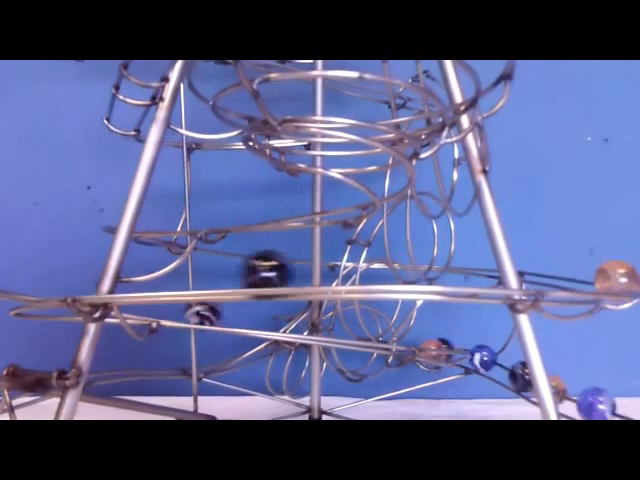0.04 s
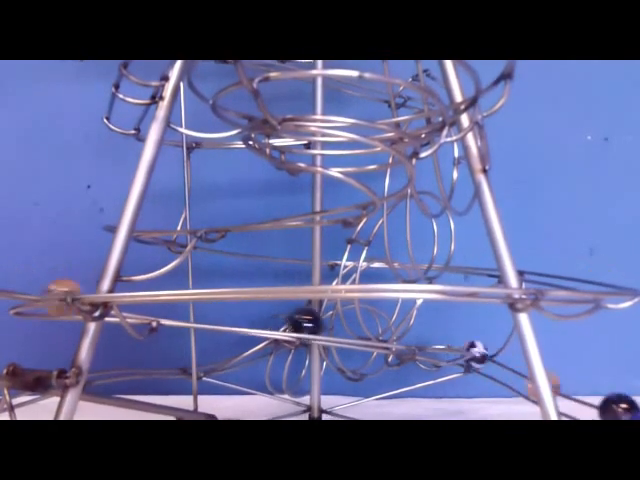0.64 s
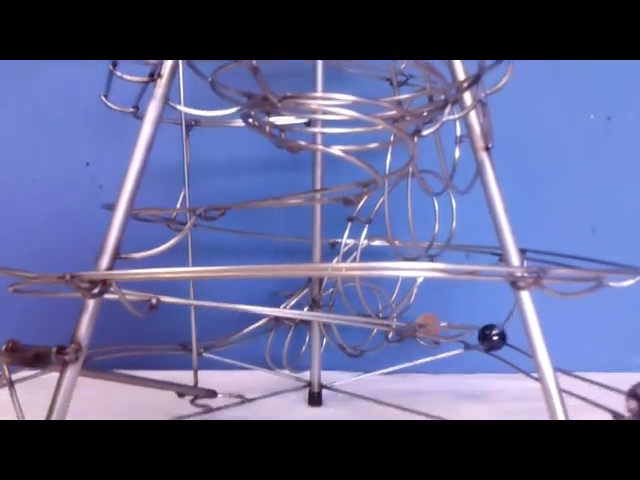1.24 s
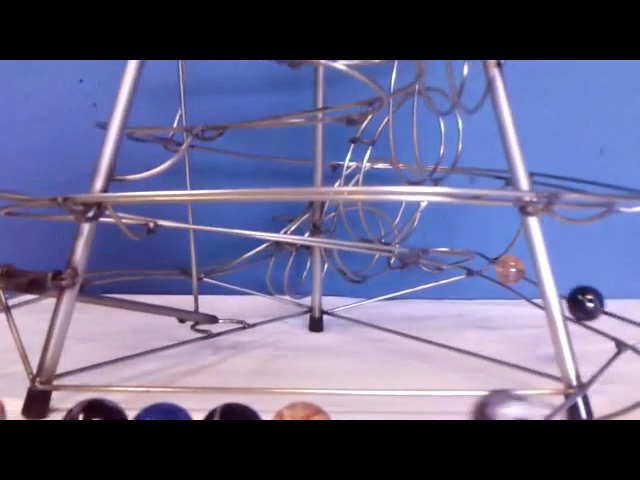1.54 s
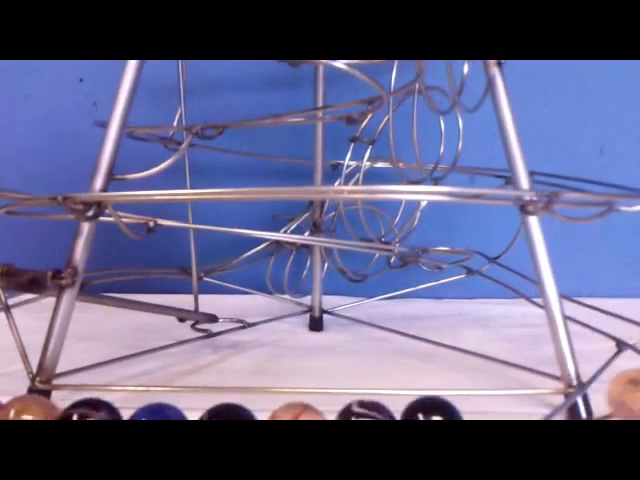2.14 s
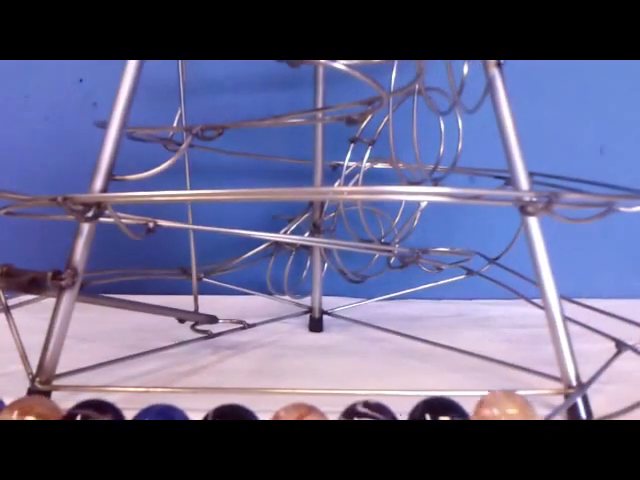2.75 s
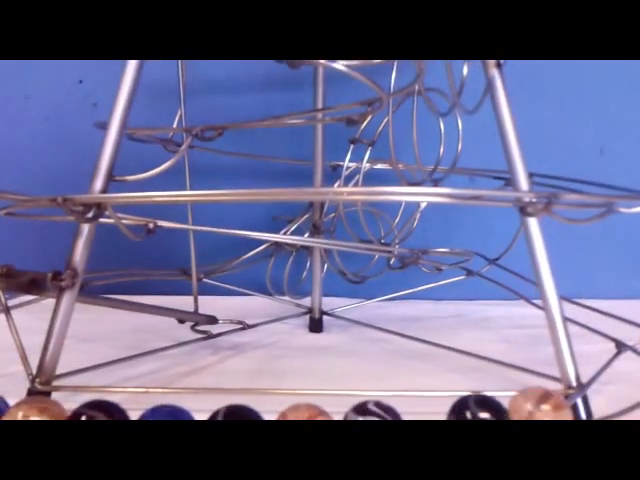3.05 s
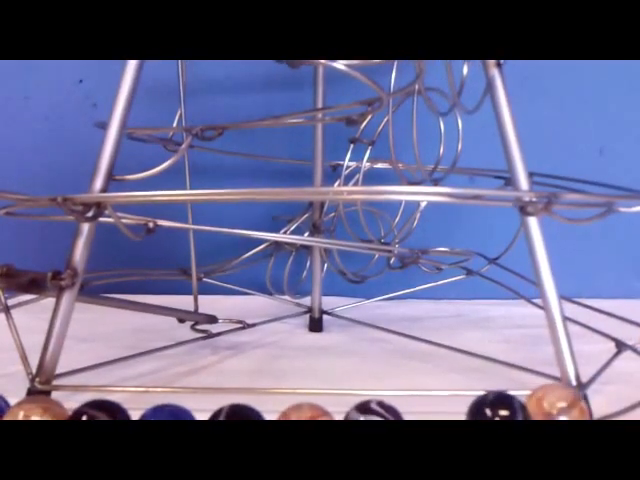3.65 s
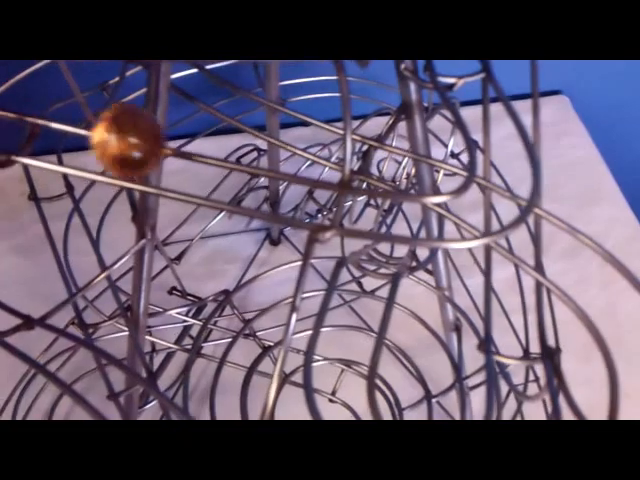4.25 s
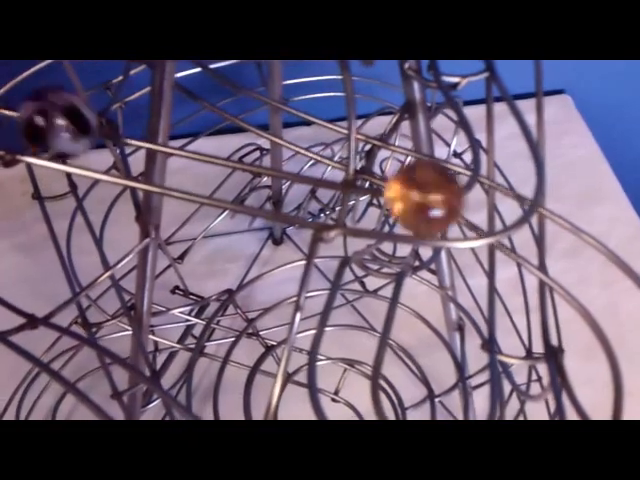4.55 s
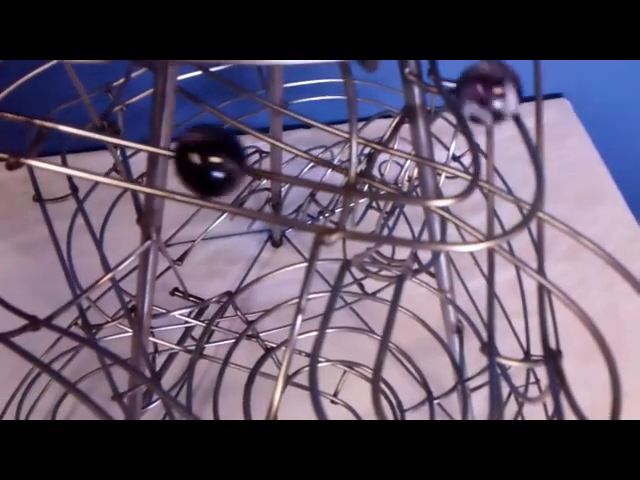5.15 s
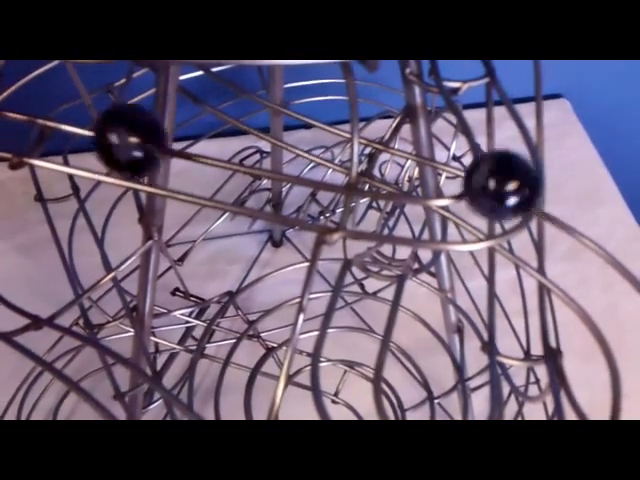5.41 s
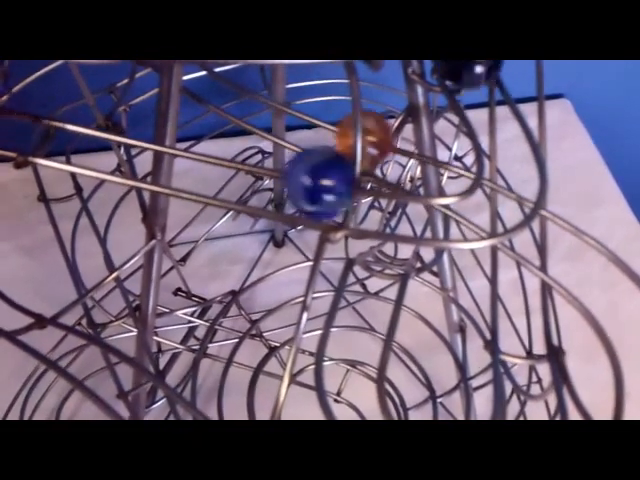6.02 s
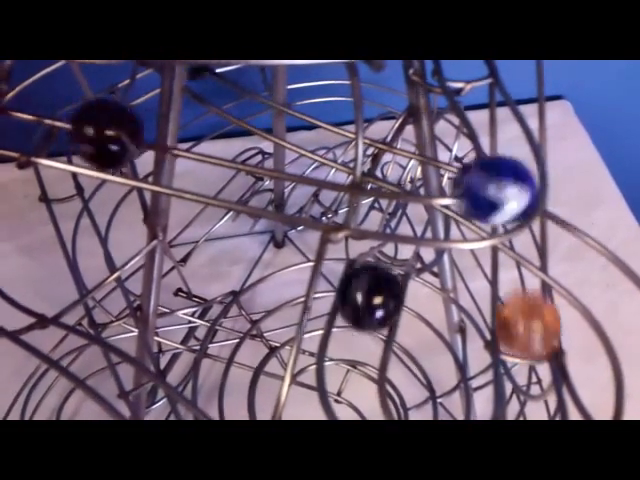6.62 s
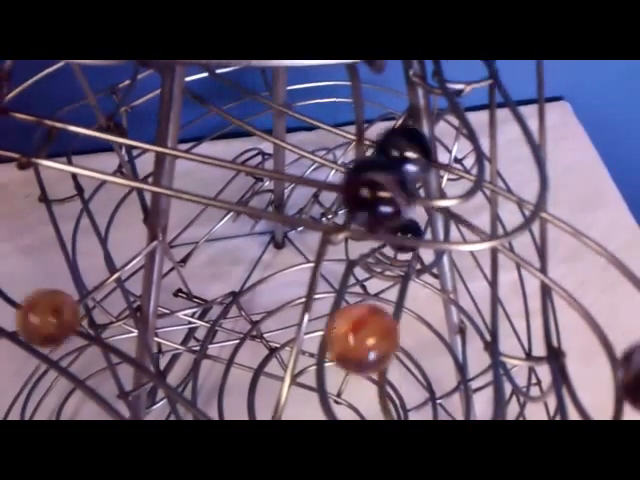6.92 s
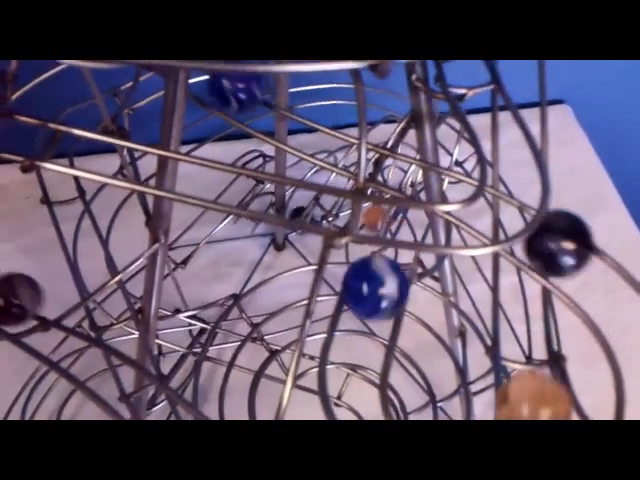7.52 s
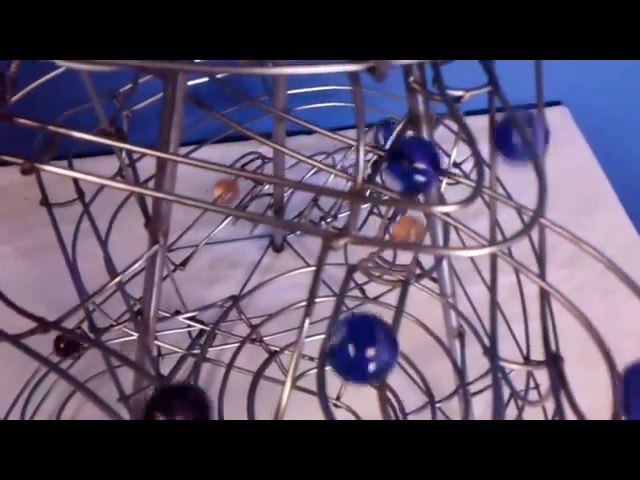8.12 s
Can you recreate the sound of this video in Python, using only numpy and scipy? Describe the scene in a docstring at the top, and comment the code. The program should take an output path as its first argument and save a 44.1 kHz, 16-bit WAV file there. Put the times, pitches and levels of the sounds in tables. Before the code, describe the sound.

Close up in a small room, the last few marbles rattle along wire rails and click against a waiting row until all is nearly still. A bump on the microphone follows. More glass marbles then come rolling, each with a ringing burst of chatter in the curves and an occasional sharp clack. Their rattle thickens and grows louder, and the metal structure rumbles low near the end.

```python
"""Glass marbles run down a welded wire track, heard by one small microphone that rings near 5 kHz.
First, at the foot, bumps in the wire excite the rails and the frame rumbles as the last marbles roll
out and clack into the waiting row. All grows still; the hiss steps up and the microphone's housing
takes a knock. After a short gap, near the top, a new batch swerves into the bends one by one, pinging
the wire, and swells to a steady rattle until the loaded frame sways on its lowest mode."""
import sys
import numpy as np
from scipy import signal
from scipy.fft import rfft, irfft
from scipy.io import wavfile
from scipy.ndimage import uniform_filter1d, minimum_filter1d

SR = 44100
rng = np.random.default_rng(int(sys.argv[2]) if len(sys.argv) > 2 else 0)


def transcribe(u):
    """Save the signal u as a 16-bit wav file named by the first command-line argument.

    u: samples, shape (n,) or (channels, n), limited to [-1, 1]; the rate is SR.
    q: integer samples, one column per channel.
    """
    v = np.clip(np.atleast_2d(u).T, -1, 1)
    q = np.round(v * 32767).astype(np.int16)
    wavfile.write(sys.argv[1], SR, q)


N = 364707
TIME = np.arange(N) / SR

# Rattle on the lower and upper track. Each row: time in seconds, relative level in dB.
FOOT_RATTLE_LEVEL = [(0.0, -33.5), (0.21, -35.5), (0.64, -31), (1.03, -36), (1.17, -37), (1.41, -39),
                     (1.64, -44), (2.01, -50.5), (2.43, -49.5), (2.49, -53.5), (2.64, -64.5), (2.74, -70.5),
                     (3.4, -82), (3.95, -74)]
TOP_RATTLE_LEVEL = [(4.05, -56.5), (4.14, -55.5), (4.31, -34.5), (4.39, -35.5), (4.98, -39), (5.26, -34.5),
                    (5.94, -33.5), (6.29, -29), (6.88, -28), (6.99, -31), (7.16, -28), (7.56, -24.5),
                    (8.07, -22), (8.27, -23.5)]
# The frame's rumble at the foot and its sway at the top. Each row: time in seconds, level in dB.
FOOT_RUMBLE_LEVEL = [(.45, -42.5), (.62, -41), (.93, -40.5), (1.1, -49), (1.55, -47), (1.9, -55.5),
                     (2.5, -56.5), (3.05, -72.5)]
SWAY_LEVEL = [(4.05, -50.5), (7.55, -44.5), (7.65, -35.5), (7.85, -39.5), (8.08, -30), (8.27, -41)]
# Spectra of the sources. Each row: frequency in Hz, relative spectral density in dB.
FOOT_RATTLE_SPECTRUM = [(600, -26), (1400, -22), (2200, -18), (4100, -10), (5020, -3), (5350, -8),
                        (5850, -8), (6400, -13), (9100, -25), (10100, -21.5), (13000, -38.5),
                        (15500, -58.5)]
FOOT_RUMBLE_SPECTRUM = [(25, -8), (90, 1), (160, -3), (390, -2.5), (490, -11), (680, -19), (1050, -15.5),
                        (1800, -41)]
QUIET_NOISE_SPECTRUM = [(25, -1.5), (75, -7.5), (130, -10), (350, -17), (650, -32.5), (1500, -37),
                        (5000, -38.5), (8000, -43.5), (15500, -44)]
CLACK_SPECTRUM = [(200, -25.5), (900, -26), (3100, -7), (4100, -1), (4850, 6.5), (5400, 2), (6700, -4.5),
                  (8000, -14), (10000, -11.5), (12200, -17), (13500, -45.5)]
LOUDER_NOISE_SPECTRUM = [(25, -3), (60, 4), (300, -16), (650, -24.5), (2300, -34), (5500, -31), (7200, -35),
                         (15500, -43)]
HOUSING_SPECTRUM = [(40, -1), (110, 9), (300, 5), (800, -6), (1700, 3), (4000, 4), (6600, 1), (7700, -26),
                    (15000, -42)]
TOP_RATTLE_SPECTRUM = [(600, -30), (1200, -25.5), (2500, -17), (3900, -9), (4550, -2), (5050, -1.5),
                       (6400, -13), (9300, -24), (9900, -20), (13000, -35.5), (15500, -47)]
TOP_RUMBLE_SPECTRUM = [(25, -6), (80, -1), (320, -0.5), (480, -10.5), (1400, -29)]
# Normal modes of rails and frame. Each row: frequency in Hz, bandwidth in Hz, relative gain in dB.
FOOT_RAIL_MODES = [(2960, 50, -6.5), (4554, 100, -1), (5010, 160, -1.5), (8560, 120, 0.5)]
TOP_RAIL_MODES = [(2870, 17, 3), (3000, 40, -4), (3410, 77, -4), (4530, 32, 0), (4690, 72, -0.5),
                  (4872, 25, -8.5), (5010, 56, -2.5), (5600, 52, -1.5), (8490, 190, 0)]
WIRE_FRAME_MODES = [(259, 14, -1), (316.3, 7.2, -7)]
# Glass strikes glass or wire. Each row: start in seconds, relative peak in dB, contact hardness as a
# cutoff in Hz, time to the next contact in seconds (0 for a lone click).
COLLISIONS = [(0.5383, -10, 8900, .0005), (0.6435, -11, 10600, .0004), (0.6627, -12, 8800, 0),
              (0.679, -10, 7700, 0), (1.0262, -6, 9500, .0014), (1.0877, -6, 10000, .0012),
              (1.0924, -6.5, 10100, 0), (1.0974, -7, 8140, 0), (1.2026, -13.5, 6620, 0),
              (1.2287, -13, 6260, 0), (1.3502, -7, 10700, .00027), (1.3932, -5.5, 10600, .0004),
              (1.47, -11.5, 7500, .0006), (1.4922, -11, 6000, .0006), (1.596, -15, 9800, .0005),
              (1.6715, -11.5, 7500, .00062), (1.776, -20, 6100, .0006), (1.863, -9.5, 8560, .0006),
              (1.9074, -6, 9500, .00035), (1.9376, -8, 6100, 0), (1.9395, -9, 6500, 0),
              (1.9553, -12, 6900, 0), (2.249, -25, 5200, 0), (2.2759, -19, 6800, .0006),
              (2.3011, -4, 10000, .0012), (2.343, -8, 6750, 0), (2.4977, -5, 9800, .00066),
              (2.5072, -6.5, 6470, 0), (2.5862, -18.5, 6570, .0004), (2.6857, -36, 5000, .0006),
              (2.9278, -6.5, 5500, 0), (2.9535, -7.5, 6000, 0), (3.311, -47, 5000, 0),
              (4.142, -22, 9100, .0008), (4.193, -20, 10000, .0012), (4.226, -14, 6600, .0012),
              (4.469, -10, 10000, .0015), (4.5718, 0, 10000, .0008), (4.5745, -3, 10000, .0006),
              (5.3645, -7, 8300, .0008), (5.368, -3, 8300, .0006), (5.385, -12, 8000, .0006),
              (6.189, -12, 7000, .001)]
# Blows on the microphone's housing. Each row: start in seconds, peak in dB.
HOUSING_BLOWS = [(3.904, -16), (3.906, -34), (3.9067, -32.5)]
# In a bend a marble glances off one rail, then chatters along the other. Each row: start in seconds,
# glance level in dB, crossing time in seconds, chatter level in dB.
BEND_PASSES = [(4.141, -40.5, 0.06, -29), (4.293, -35.5, 0.037, -23.5), (4.47, -23, 0.055, -20),
               (4.696, -28, 0.072, -35.5), (4.847, -29.5, 0.055, -25), (5.09, -32, 0.039, -24),
               (5.276, -23.5, 0.056, -20.5), (5.447, -36, 0.047, -26.5), (5.645, -28.5, 0.055, -24.5),
               (5.875, -30, 0.041, -23.5), (6.059, -25, 0.06, -21.5), (6.265, -27.5, .048, -23),
               (6.41, -25, 0.05, -21), (6.586, -34, .03, -38), (6.688, -27.5, 0.053, -22.5),
               (6.862, -24, 0.059, -21), (7.916, -20, 0.13, -23.5)]

CONTACT_SHARES = (0.52, 0.79, 0.41)   # strengths of three successive contacts along the row
GAP_START_S, GAP_END_S = 3.973, 4.047   # silence between the two places
USUAL_RATTLE_DB, USUAL_SWERVE_DB = -31, -23.5   # reference levels


def from_db(db):
    """Amplitude grows tenfold for every 20 dB."""
    return 10 ** (np.asarray(db) / 20)


def unit_rms(x):
    """Normalisation to a mean power of 1."""
    return x / np.sqrt(np.mean(x ** 2) + 1e-20)


def envelope(rows):
    """Exponential growth and decay: straight lines in dB between the given times."""
    times, db = np.transpose(rows)
    return from_db(np.interp(TIME, times, db))


def drift(per_s):
    """Slow random modulation with a standard deviation near 1."""
    knots = rng.standard_normal(N // 20)
    return np.interp(TIME * per_s, np.arange(len(knots)), knots) * np.sqrt(3 / 2)


def delayed(x, seconds):
    """Pure delay: the same wave arrives later."""
    return np.pad(x, (round(seconds * SR), 0))[:len(x)]


def impulse_response(spectrum, size=4096):
    """Minimum phase: folding the cepstrum gives a causal response with this spectrum."""
    hz, db = np.transpose(spectrum)
    grid_hz = np.maximum(np.fft.rfftfreq(size, 1 / SR), 1)
    magnitude = from_db(np.interp(np.log(grid_hz), np.log(hz), db))
    cepstrum = irfft(np.log(magnitude))
    cepstrum[1:size // 2] *= 2
    cepstrum[size // 2 + 1:] = 0
    return irfft(np.exp(rfft(cepstrum)))


def colour(x, spectrum):
    """Convolution imposes a body's spectrum on x; the result has rms 1."""
    return unit_rms(signal.fftconvolve(x, impulse_response(spectrum))[:N])


def resonance(x, hz, width_hz):
    """A damped oscillator: two poles, with gain 1 at the peak."""
    radius = np.exp(-np.pi * width_hz / SR)
    feedback = [1, -2 * radius * np.cos(2 * np.pi * hz / SR), radius ** 2]
    return signal.lfilter(np.array([1, 0, -1]) * (1 - radius ** 2) / 2, feedback, x)


def ringing(force, modes, swing_db=4, swings_per_s=7):
    """Modal superposition: each mode swells and fades at random as marbles cross its nodes."""
    return sum(from_db(db + swing_db * drift(swings_per_s)) * resonance(force, hz, width_hz)
               for hz, width_hz, db in modes)


def rolling(level, spectrum, modes, bumps_per_s, spread_db, wobble_db, hiss, tilt_db_per_octave=0):
    """Roughness excitation: glass skips over tiny bumps in the wire, and each tick rings the rails."""
    sizes = from_db(spread_db * np.minimum(rng.exponential(1, N), 4)) * rng.choice([-1, 1], N)
    bumps = rng.random(N) < bumps_per_s / SR
    ticks = unit_rms(sizes * bumps) + hiss * rng.standard_normal(N)
    ticks *= from_db(wobble_db * drift(per_s=70))   # the marble rocks between its two rails
    # Harder pressure on the rail makes shorter contacts, which tilt the treble upward.
    tilted = [(hz, db + tilt_db_per_octave * np.clip(np.log2(hz / 5000), 0, 2)) for hz, db in spectrum]
    return level * colour(ticks + ringing(ticks, modes), tilted)


def follow(rattle, slope):
    """A power law: the gain is 1 at the usual rattle and moves by slope dB per dB."""
    return (rattle / from_db(USUAL_RATTLE_DB)) ** slope


def brighten(x, rattle, treble_hz=6400):
    """Contact time sets bandwidth: faster marbles rattle louder and carry more treble."""
    lows = signal.sosfiltfilt(signal.butter(2, treble_hz, fs=SR, output="sos"), x)
    return lows + (x - lows) * follow(rattle, slope=0.48)


def rumble(level, spectrum, wobble_db=1.5):
    """Forced vibration: the weight of the marbles shakes the frame and the board under it."""
    force = rng.standard_normal(N) * from_db(wobble_db * drift(per_s=25))
    return level * colour(force + ringing(force, WIRE_FRAME_MODES), spectrum)


def wavering_tone(hz, width_hz):
    """Narrow-band resonance turns a random force into a wavering tone of rms 1."""
    once = resonance(rng.standard_normal(N), hz, width_hz)
    return unit_rms(resonance(once, hz, width_hz))


def strut(rattle):
    """Sympathetic vibration: one strut sings along, fading more slowly than the rattle."""
    return from_db(-59.5) * follow(rattle, slope=0.54) * wavering_tone(hz=554, width_hz=27)


def room(x, t60_s, wet_db, build_up_s):
    """Reverberation: the echoes of a small room thicken, then decay exponentially."""
    t = TIME[:SR // 2]
    tail = rng.standard_normal(len(t)) * from_db(-60 * t / t60_s) * (1 - np.exp(-t / build_up_s))
    return x + from_db(wet_db) * signal.fftconvolve(x, tail / np.linalg.norm(tail))[:N]


def background(quiet_db, louder_db, step_s):
    """The noise floor: room rumble and hiss, stepping up shortly before the gap."""
    white = rng.standard_normal(N)
    quiet = from_db(quiet_db) * colour(white, QUIET_NOISE_SPECTRUM)
    louder = from_db(louder_db) * colour(white, LOUDER_NOISE_SPECTRUM)
    return np.where(TIME < step_s, quiet, louder)


def clacks(board_echo_s, board_echo_db, third_contact_s=0.000995, size=1024):
    """Elastic impact: softer contacts are duller, and closely spaced ones colour a knock by interference."""
    out = np.zeros(N + size)
    body = impulse_response(CLACK_SPECTRUM)[:size]
    for (start_s, db, hardness_hz, next_s), chance in zip(COLLISIONS, rng.random(len(COLLISIONS))):
        knock = signal.sosfilt(signal.butter(2, hardness_hz, fs=SR, output="sos"), body)
        if next_s > 0:   # the impulse passes on to touching neighbours
            lags = 0, next_s, next_s + third_contact_s * (0.5 + chance)
            knock = sum(share * delayed(knock, lag) for share, lag in zip(CONTACT_SHARES, lags))
        knock = knock + from_db(board_echo_db) * delayed(knock, board_echo_s)
        start = int(start_s * SR)
        out[start:start + size] += from_db(db) * knock / np.abs(knock).max()
    return out[:N]


def jolt(force, gain_db=-16.5, decay_s=0.11):
    """Energy storage and damping: the frame's amplitude rises with a push, then dies away."""
    retained = np.exp(-2 / (decay_s * SR))
    energy = signal.lfilter([1 - retained], [1, -retained], force ** 2 + 1e-18)
    return from_db(gain_db) * np.sqrt(energy)


def wall_echo(x):
    """Specular reflection: one distinct echo from the nearest wall."""
    return from_db(-22.5) * delayed(x, seconds=0.0086)


def housing_knock():
    """Structure-borne sound: a knock through the microphone's casing has low thump and no room."""
    blows = np.zeros(N)
    for start_s, db in HOUSING_BLOWS:
        blows[int(start_s * SR)] = from_db(db)
    body = impulse_response(HOUSING_SPECTRUM)
    return signal.fftconvolve(blows, body / np.abs(body).max())[:N]


def swerve_envelope(settle_s, strike_s, db_per_doubling=11):
    """Incoherent powers add: on each rail in turn a marble strikes, chatters, then settles."""
    power = np.zeros(N)
    for start_s, glance_db, crossing_s, chatter_db in BEND_PASSES:
        glance = start_s, glance_db, 0.025, 0.0018, 0.6   # the first rail is hit abruptly
        lean = start_s + crossing_s, chatter_db, 0.032, 0.0041, 0.4   # the second is leaned into
        for at_s, db, usual_cling_s, rise_s, strike_share in glance, lean:
            start = int(at_s * SR)
            t = TIME[:min(SR // 3, N - start)]
            # A faster, louder marble stays pressed to the rail for longer.
            cling_s = usual_cling_s * 2 ** ((db - USUAL_SWERVE_DB) / db_per_doubling)
            chatter = (1 - np.exp(-t / rise_s)) * np.exp(-np.maximum(t - cling_s / 2, 0) / settle_s)
            blow = strike_share * settle_s / (settle_s + cling_s) * np.exp(-t / strike_s)
            power[start:start + len(t)] += (from_db(db) * (chatter + blow)) ** 2
    return np.sqrt(power)


def pings(above_glance_db):
    """Free vibration: each glancing blow leaves the wire ringing in its modes for a moment."""
    blows = np.zeros(N)
    for start_s, glance_db, _, _ in BEND_PASSES:
        blows[int(start_s * SR)] = from_db(glance_db + above_glance_db)
    tick = impulse_response(TOP_RATTLE_SPECTRUM)
    ring = sum(from_db(db) * resonance(tick, hz, width_hz) for hz, width_hz, db in TOP_RAIL_MODES)
    return signal.fftconvolve(blows, ring / np.abs(ring).max())[:N]


def sway(level):
    """The fundamental mode of the heavily loaded frame, driven at random by the marbles."""
    return level * wavering_tone(hz=93.2, width_hz=30)


def scene():
    """Superposition of the sources, at the foot and then at the top; both channels are alike."""
    knocks = from_db(0.5) * clacks(board_echo_s=0.0025, board_echo_db=-17.5)
    rattle = envelope(FOOT_RATTLE_LEVEL)
    shake = np.hypot(envelope(FOOT_RUMBLE_LEVEL), from_db(-10.5) * jolt(knocks))
    run_out = from_db(1.0) * rolling(rattle, FOOT_RATTLE_SPECTRUM, FOOT_RAIL_MODES, bumps_per_s=1800,
                                     spread_db=-0.5, wobble_db=1.55, hiss=0.8)
    foot = brighten(run_out, rattle) + rumble(shake, FOOT_RUMBLE_SPECTRUM) + strut(rattle)

    rattle = envelope(TOP_RATTLE_LEVEL)
    swaying = envelope(SWAY_LEVEL)
    swerving = swerve_envelope(settle_s=0.034, strike_s=0.0048)
    rolling_shake = from_db(-43.5) * follow(rattle, slope=0.54)
    shake = np.sqrt(rolling_shake ** 2 + jolt(swerving) ** 2 + (from_db(-4) * swaying) ** 2)
    straights = from_db(-0.5) * rolling(rattle, TOP_RATTLE_SPECTRUM, TOP_RAIL_MODES, bumps_per_s=3000,
                                        spread_db=0.5, wobble_db=-0.02, hiss=0.67,
                                        tilt_db_per_octave=-1.5)
    bends = rolling(swerving, TOP_RATTLE_SPECTRUM, TOP_RAIL_MODES, bumps_per_s=1400,
                    spread_db=1.0, wobble_db=1.0, hiss=0.43, tilt_db_per_octave=3.5)
    top = brighten(straights, rattle) + bends + pings(above_glance_db=4.5)
    top += rumble(shake, TOP_RUMBLE_SPECTRUM) + sway(swaying)

    track = room(np.where(TIME > GAP_START_S, top, foot), t60_s=0.27, wet_db=-11.0, build_up_s=0.0069)
    knocks = room(knocks, t60_s=0.21, wet_db=-12.0, build_up_s=0.0057) + wall_echo(knocks)
    mono = track + knocks + housing_knock() + background(quiet_db=-61.5, louder_db=-55, step_s=3.52)
    return np.array([mono, mono])


def limit(x, ceiling_db, window=88):
    """Peak limiting: a fast drop in gain holds the loudest clacks at one height."""
    peak = -minimum_filter1d(-np.abs(x), window)
    gain = np.minimum(1, from_db(ceiling_db) / (peak + 1e-9))
    return x * uniform_filter1d(gain, window)


def record(dry, cutoff_hz=15600):
    """Amplitude and bandwidth are limited, and the sound drops out between the two places."""
    outside_gap = (TIME < GAP_START_S) | (TIME > GAP_END_S)
    gate = np.maximum(uniform_filter1d(1.0 * outside_gap, size=64), from_db(-48.5))
    lowpass = signal.ellip(12, 0.1, 80, cutoff_hz, fs=SR, output="sos")
    return signal.sosfilt(lowpass, limit(dry, ceiling_db=-4.5) * gate)


dry = scene()
out = record(dry)
transcribe(out)
```